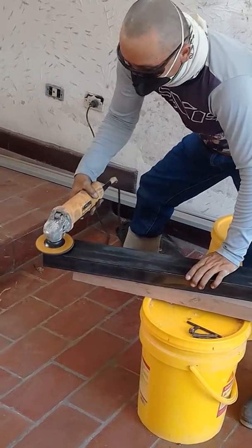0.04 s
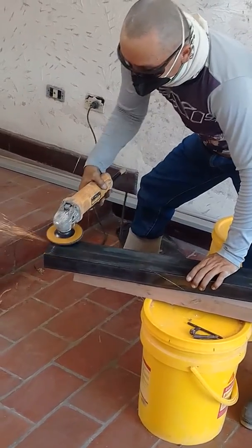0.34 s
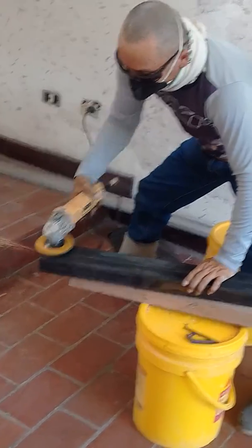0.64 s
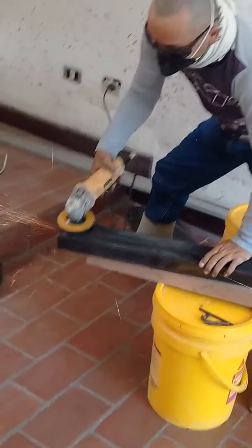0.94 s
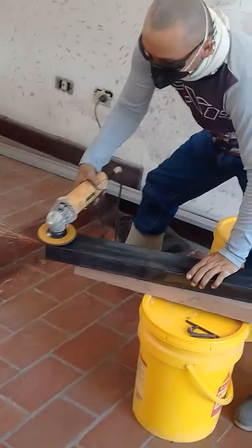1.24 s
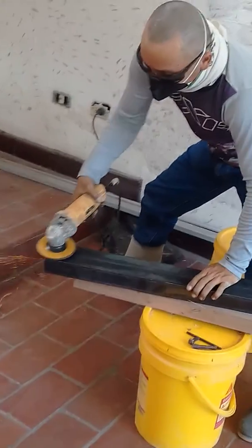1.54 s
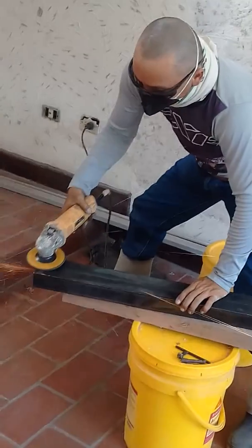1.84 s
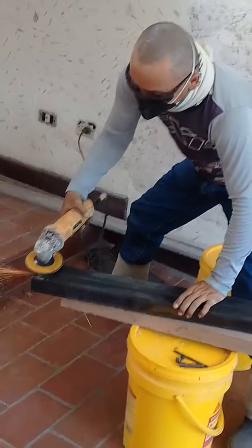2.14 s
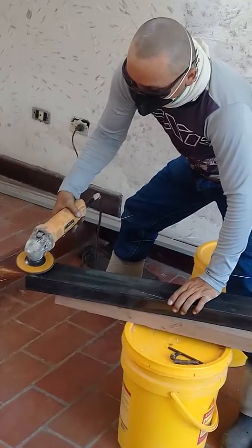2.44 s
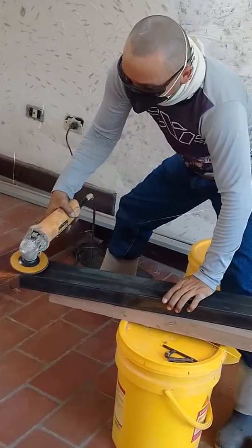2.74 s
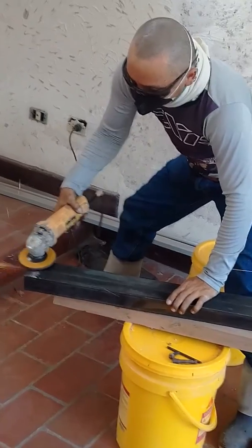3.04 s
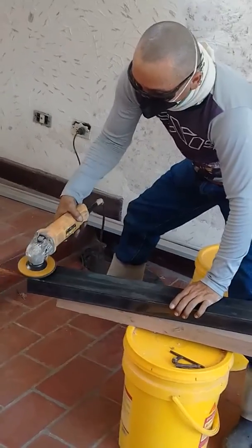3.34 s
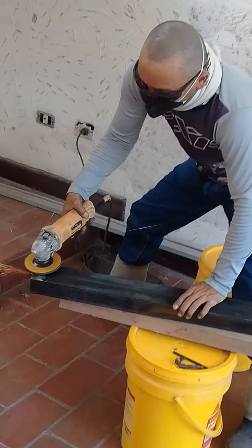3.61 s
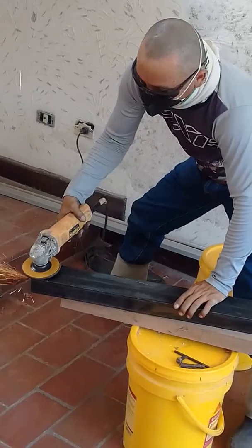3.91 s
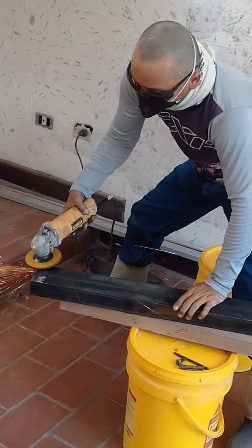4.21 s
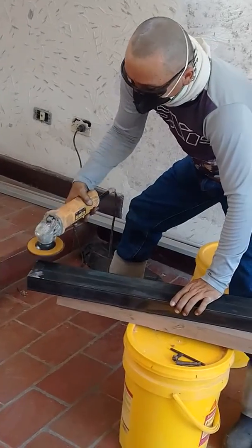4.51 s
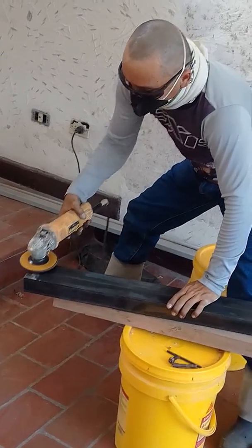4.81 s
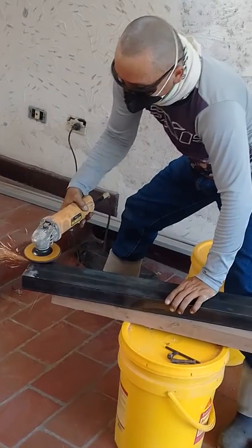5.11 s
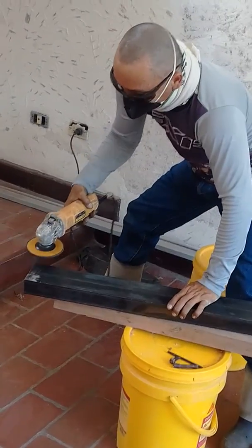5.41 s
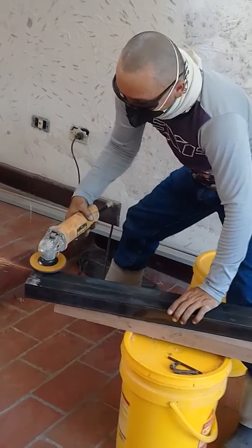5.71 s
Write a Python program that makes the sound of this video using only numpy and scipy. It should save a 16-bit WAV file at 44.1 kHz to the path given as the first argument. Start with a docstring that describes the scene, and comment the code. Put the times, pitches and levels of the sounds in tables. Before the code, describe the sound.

A corded angle grinder whines, rasping and squealing against a ringing steel tube in repeated short passes in a small room.

```python
"""A corded angle grinder works on a steel tube in a small tiled room, in short passes with two pauses.
On the steel its grit rasps and hisses, its rim squeals by stick-slip friction, the disc knocks and the
tube rings in its modes, all following the pressure and tilt of the hand. Deep cuts sizzle and subdue
the ringing. The motor whines and its fan and gears hiss throughout. The loudest peaks are soft-clipped."""
import sys
import numpy as np
from scipy import signal
from scipy.fft import rfft, irfft
from scipy.io import wavfile
from scipy.ndimage import uniform_filter1d

SR = 44100
rng = np.random.default_rng(int(sys.argv[2]) if len(sys.argv) > 2 else 0)


def file_out(sig):
    """Save sig as 16-bit WAV at sys.argv[1]."""
    # one column per channel
    cols = np.atleast_2d(sig).T
    # limit, then scale
    lim = np.clip(cols, -1, 1)
    pcm = np.round(lim * 32767).astype(np.int16)
    wavfile.write(sys.argv[1], SR, pcm)


N = 262836
TIME = np.arange(N) / SR


def abrasion(spindle, rasp_db, hiss_db, sizzle_db, runout=0.12):
    """Shot noise of grains tearing steel, peaking once a turn: coarse rasp, fine hiss, deep sizzle."""
    # spectra of coarse grains, fine grains and deep cutting: frequency_hz, density_db
    rasp_spectrum = [(150, -24), (400, -6), (800, -5.5), (1600, -1.5), (2600, 3.5), (3800, 0.5), (4800, 1),
                     (6200, -2), (8000, -1.5), (16000, -41)]
    grit_spectrum = [(3000, -23), (6000, -14), (8000, 4.5), (9700, 5), (11500, -3.5), (12900, -14.5),
                     (16000, -21)]
    sizzle_spectrum = [(200, -21.5), (700, 1.5), (1600, 5), (4000, -10), (9000, -14), (11800, 9),
                       (13000, 3.5), (14300, 8), (16000, -2)]
    bite = (1 + runout * np.cos(spindle)) * from_db(drift(40))
    rasp = rms_one(colour(impacts(per_s=5000, spread_db=2) * bite, rasp_spectrum))
    hiss = rms_one(colour(impacts(per_s=16000, spread_db=4) * bite, grit_spectrum))
    sizzle = rms_one(colour(impacts(per_s=5300, spread_db=10) * bite, sizzle_spectrum))
    return from_db(rasp_db) * rasp + from_db(hiss_db) * hiss + from_db(sizzle_db) * sizzle


def skid(level_db):
    """Sliding friction: grains that slip without cutting give a lower, softer hiss."""
    # spectrum of sliding grains: frequency_hz, density_db
    skid_spectrum = [(2500, -22.5), (4000, -10), (4600, -8), (5200, -3.5), (5650, 1.5), (6500, -2),
                     (7500, -3), (9000, -28)]
    return from_db(level_db) * rms_one(colour(impacts(per_s=25000, spread_db=0), skid_spectrum))


def squeal(level_db, centre_hz, direct_db=-9):
    """Stick-slip oscillation: the rim darts in pitch and excites whichever mode of the disc it passes."""
    # modes of the disc: frequency_hz, bandwidth_hz, gain_db
    disc_modes = [(6900, 200, -0.5), (7280, 76, 1), (7900, 240, -3.5), (8330, 200, -6), (8760, 160, 2.5)]
    pitch_hz = centre_hz + 360 * drift(110) + 440 * drift(900)
    slips = np.sin(2 * np.pi * np.cumsum(pitch_hz) / SR)
    ringing = sum(from_db(db) * resonance(slips, hz, width) for hz, width, db in disc_modes)
    vibration = from_db(direct_db) * slips + ringing
    # friction feeds the vibration only up to a limit, so its amplitude stays nearly even
    envelope = np.sqrt(np.abs(uniform_filter1d(vibration ** 2, size=300)) + 1e-9)
    return from_db(level_db) * vibration / envelope


def tube_ring(force, width_hz=17, swell_db=3, trim_db=-2.5):
    """Modal resonance: grinding rings the tube, each mode swelling and fading as the contact travels."""
    # modes of the tube: frequency_hz, gain_db
    tube_modes = [(1070, 4.5), (1632, -2), (2433, 8.5), (2611, 3.5), (2847, 9.5), (3445, 6.5), (4285, 11.5),
                  (4320, 9.5), (4610, 11.5), (4700, 13), (4980, 3), (5766, 3), (6379, 5.5), (6756, 12.5),
                  (7210, 6), (7272, 11), (7880, 13.5), (8010, -1), (8339, -15), (8500, -3), (8656, 9),
                  (9695, 2), (10363, 12.5), (11063, 6), (11350, 13), (11697, 8), (12317, 14), (13838, 7),
                  (14135, 9), (14610, 3)]
    return sum(from_db(db + trim_db) * resonance(force * from_db(swell_db * drift(5.6)), hz, width_hz)
               for hz, db in tube_modes)


def tube_singing():
    """Self-excited vibration: friction feeds a single mode, which swells to a rough note and dies."""
    # notes of the tube: middle_s, length_s, pitch_hz, level_db
    notes = [(0.876, 0.15, 4310, -25), (1.21, 0.1, 1635, -30.5), (1.244, 0.078, 3445, -32),
             (1.44, 0.15, 1610, -27), (1.549, .08, 4610, -25.5), (2.099, 0.11, 1077, -37),
             (2.301, 0.23, 4970, -27.5), (2.38, 0.46, 2841, -24), (2.48, 0.11, 2430, -25.5),
             (2.696, 0.12, 2840, -22), (2.86, 0.18, 1078, -30.5), (3.1, 0.73, 2850, -39.5),
             (5.077, .16, 4620, -28), (5.92, .16, 562.4, -30.5)]
    flutter = from_db(2 * drift(22))
    waver_rad = drift(12) / 2
    sound = np.zeros(N)
    for middle_s, length_s, hz, db in notes:
        near = np.abs(TIME - middle_s) < length_s
        swell = np.exp(-(2 * (TIME[near] - middle_s) / length_s) ** 4)
        tone = np.sin(2 * np.pi * hz * TIME[near] + waver_rad[near])
        sound[near] += from_db(db) * swell * flutter[near] * tone
    return sound


def tube_drone(force, width_hz=9):
    """Beating: the pressing disc shakes the whole tube, and two close bending modes interfere."""
    # low bending modes: frequency_hz, relative_db
    bending_modes = [(565, 0), (607, -1)]
    shake = rng.standard_normal(N) * force
    bending = sum(from_db(db) * resonance(shake, hz, width_hz) for hz, db in bending_modes)
    return rms_one(bending) * np.std(shake)


def knocking(level_db):
    """Impact noise: the disc hops on the steel in a few hundred dull blows a second."""
    # spectrum of the blows: frequency_hz, density_db
    knock_spectrum = [(30, -26), (60, -14.5), (100, -2.5), (160, 2.5), (300, 2.5), (550, 0.5), (900, -3.5),
                      (1600, -9), (4000, -42)]
    return from_db(level_db) * rms_one(colour(impacts(per_s=430, spread_db=5), knock_spectrum))


def clatter(level_db, hz=880, width_hz=900):
    """Hard impacts: under high pressure the edge strikes sharper, brighter blows."""
    blows = resonance(impacts(per_s=900, spread_db=6), hz, width_hz)
    return from_db(level_db) * rms_one(resonance(blows, hz, 2 * width_hz))


def bumps(thud_hz=420):
    """Impulse response: each hard landing is one heavily damped swing of the disc."""
    # the disc lands or catches: time_s, peak_db
    landings = [(.148, -22), (.341, -21), (.38, -19), (1.024, -18), (1.073, -19), (1.092, -17),
                (1.333, -20), (1.342, -14), (1.354, -14), (1.426, -11), (4.952, -8), (4.971, -9),
                (4.978, -17)]
    swing = resonance(signal.unit_impulse(SR // 20), thud_hz, width_hz=620)
    swing = resonance(swing, thud_hz, width_hz=1650)
    clicks = np.zeros(N)
    for time_s, db in landings:
        clicks[round(time_s * SR)] = from_db(db)
    return signal.fftconvolve(clicks, swing / np.abs(swing).max())[:N]


def motor(spindle, level_db, throb=0.071, case_db=15, whine_db=-31):
    """Rotating-machine noise: a whine locked to the spindle, fan air, and teeth ringing the gear case."""
    # resonances of the gear case: frequency_hz, bandwidth_hz, gain_db
    case_modes = [(1690, 510, -12.5), (5794, 210, 1), (8690, 640, -3.5), (10400, 560, -39.5),
                  (11380, 230, -35)]
    # spectrum of the fan's air: frequency_hz, density_db
    fan_spectrum = [(40, -35), (150, -30), (400, -34), (800, -13.5), (1400, -3.5), (2400, 3), (3800, -0.5),
                    (6500, 6), (8200, 4), (10500, 3), (12500, -6.5), (16000, -7)]
    # partials of motor and gears: spindle_multiple, relative_db
    partials = [(2, -23), (3, -2), (4, -10), (5.5, -1), (7, 3), (8, 1), (9.5, 8), (10.5, -0.5)]
    pulsing = 1 + throb * np.cos(spindle)
    teeth = rms_one(impacts(per_s=7000, spread_db=3)) * pulsing
    case = sum(from_db(db) * resonance(teeth, hz, width) * from_db(2.65 * drift(11.4))
               for hz, width, db in case_modes)
    fan = colour(rng.standard_normal(N) * pulsing, fan_spectrum)
    whine = sum(from_db(db + 1.2 * drift(8)) * np.sqrt(2) * np.sin(multiple * spindle)
                for multiple, db in partials)
    hiss = rms_one(fan + from_db(case_db) * case)
    return from_db(level_db) * (hiss + from_db(whine_db) * whine)


def room(x, t60_s=0.3, wet_db=-6):
    """Reverberation: hard walls and floor return a dense, short tail, thin in the bass."""
    t = TIME[:SR // 2]
    tail = rng.standard_normal(len(t)) * from_db(-60 * t / t60_s) * (t > .004)
    tail = signal.sosfilt(signal.butter(1, 700, "high", fs=SR, output="sos"), tail)
    return x + from_db(wet_db) * signal.fftconvolve(x, tail / np.linalg.norm(tail))[:N]


def hand_pressure(resting_db=-16, mid_stroke_db=2, press_s=.03, release_s=.0701):
    """Normal force of the hand in dB, and an arch that rises from 0 to 1 and back over each stroke."""
    # pushes along the tube: start_s, end_s, pressure_db
    strokes = [(0, .06, -9), (.135, .15, -8.5), (.33, .76, -2), (.78, 1.0, -9.5), (1.02, 1.2, -0.5),
               (1.335, 1.61, 1), (1.72, 1.97, 1), (2.16, 2.43, 0), (2.51, 2.81, .5), (2.94, 3.42, 0),
               (3.48, 3.97, -1), (4.0, 4.35, -0.5), (4.96, 5.28, -1), (5.8, 5.96, -7.5)]
    force, arch = np.full(N, from_db(resting_db)), np.zeros(N)
    for start, end, db in strokes:
        swell = np.sin(np.pi * np.clip((TIME - start) / (end - start), 0, 1))
        push = held(start, end, press_s, release_s) ** 2 * from_db(db + mid_stroke_db * swell)
        force = np.maximum(force, push)
        arch += swell
    return 20 * np.log10(force), arch


def cut_depth(dig_s=.05):
    """Penetration of the edge into the steel, 0 while it only skims."""
    # deep cuts: start_s, end_s, relative_depth
    cuts = [(1.869, 1.89, 0.24), (2.7, 2.73, 0.34), (3.56, 3.62, 1.0), (3.699, 3.92, 0.71),
            (4.041, 4.12, .5), (4.2, 4.31, 1.05), (5.055, 5.065, .35), (5.191, 5.26, 1.2)]
    return np.max([depth * held(start, end, dig_s, dig_s) for start, end, depth in cuts], axis=0)


def in_contact(lift_s=0.021):
    """Mechanical coupling: 1 while the disc touches the steel, fading to 0 as it lifts."""
    # spells of contact: start_s, end_s
    spells = [(0, 4.39), (4.957, 5.345), (5.794, 5.96)]
    return sum(held(start, end, lift_s, lift_s) for start, end in spells)


def impacts(per_s, spread_db):
    """Poisson process: clicks at random moments with uneven strengths."""
    sizes = from_db(spread_db * np.clip(rng.standard_normal(N), -2, 2)) * rng.choice([-1, 1], N)
    return sizes * (rng.random(N) < per_s / SR)


def resonance(x, hz, width_hz):
    """Damped oscillator: a two-pole resonance with gain 1 at its peak."""
    radius = np.exp(-np.pi * width_hz / SR)
    feedback = [1, -2 * radius * np.cos(2 * np.pi * hz / SR), radius ** 2]
    return signal.lfilter(np.array([1, 0, -1]) * (1 - radius ** 2) / 2, feedback, x)


def colour(x, spectrum, size=4096):
    """Minimum-phase filtering: a causal response with the given spectrum."""
    hz, db = np.transpose(spectrum)
    bins_hz = np.maximum(np.fft.rfftfreq(size, 1 / SR), 1)
    gain = from_db(np.interp(np.log(bins_hz), np.log(hz), db))
    cepstrum = irfft(np.log(gain))[:size // 2]
    cepstrum[1:] *= 2
    response = irfft(np.exp(rfft(cepstrum, size)))
    return signal.fftconvolve(x, response)[:N]


def drift(rate_hz, step=8):
    """Low-passed noise of rms 1, changing about `rate_hz` times a second."""
    pole = np.exp(-2 * np.pi * rate_hz * step / SR)
    noise = rng.standard_normal((N + SR) // step + 2)
    slow = signal.lfilter([1], [1, -2 * pole, pole ** 2], noise)[SR // step:]
    return np.repeat(rms_one(slow), step)[:N]


def held(start, end, attack_s, release_s):
    """Trapezoidal envelope: 1 from start to end, with a ramp before and after."""
    return np.interp(TIME, [start - attack_s, start, end, end + release_s], [0, 1, 1, 0])


def eased(x, window_s):
    """Moving average of a control."""
    return uniform_filter1d(x, int(window_s * SR))


def from_db(db):
    """Decibels to amplitude ratio."""
    return 10 ** (np.asarray(db) / 20)


def rms_one(x):
    """Normalisation to rms 1."""
    return x / np.sqrt(np.mean(x ** 2) + 1e-20)


def scene(free_turns_per_s=180, sag_turns_per_s=3.5, motor_in_pauses_db=-19.5, motor_ducked_db=-24):
    """Source and resonator: pressure, tilt and depth shape the grinding, which excites the tube."""
    # the disc starts nearly flat (1) and tips on to its edge (0): time_s, flatness
    tilt = [(0, 1.0), (.3, 1.0), (.5, .75), (.8, .9), (1.0, 0.54), (1.15, 0.13), (1.9, 0.01), (2.35, 0.12),
            (3.5, 0.01), (5.96, 0.09)]
    flat = np.interp(TIME, *np.transpose(tilt))
    pressure_db, arch = hand_pressure()
    depth, touching = cut_depth(), in_contact()

    def level(base_db, per_pressure_db, flat_db, cut_db):
        """Level in dB, linear in pressure, flatness and depth of cut."""
        return base_db + per_pressure_db * pressure_db + flat_db * flat + cut_db * depth

    rasp_db = level(-23.5, 0.31, flat_db=1, cut_db=3)
    hiss_db = level(-18.5, 0.14, flat_db=-13, cut_db=0.05)
    sizzle_db = level(-29, 0.25, flat_db=-3, cut_db=10.5)
    skid_db = level(-27, 0, flat_db=7.5, cut_db=-12)
    squeal_db = level(-19.5, 0.4, flat_db=4, cut_db=1.3)
    ring_db = level(0.3, 0.1, flat_db=-0.5, cut_db=-18)
    drone_db = level(-38.5, 0.1, flat_db=0.5, cut_db=2)
    knock_db = level(-27.5, 1, flat_db=-0.7, cut_db=1)
    clatter_db = level(-34, 1.6, flat_db=-14, cut_db=9.5)

    turns_per_s = free_turns_per_s - sag_turns_per_s * eased(touching * from_db(pressure_db), window_s=.15)
    spindle = 2 * np.pi * np.cumsum(turns_per_s * (1 + 0.00299 * drift(15.8))) / SR
    # the motor noise is turned down during the loud grinding, as by a recorder's gain control
    ducking = eased(touching, window_s=.052)
    machine = motor(spindle, motor_in_pauses_db + (motor_ducked_db - motor_in_pauses_db) * ducking)
    scrape = touching * (abrasion(spindle, rasp_db, hiss_db, sizzle_db) + skid(skid_db))
    squeal_hz = 7650 + 360 * arch - 480 * flat + 170 * depth
    screech = touching * squeal(squeal_db, squeal_hz)
    settled = np.interp(TIME - .016, TIME, touching)  # hopping starts just after the disc lands
    blows = touching * settled * (knocking(knock_db) + clatter(clatter_db)) + bumps()
    tube_force = (scrape + from_db(-7) * screech) * from_db(ring_db)
    steel = tube_ring(tube_force) + tube_drone(touching * from_db(drone_db)) + tube_singing()
    return np.tile(room(machine + scrape + screech + blows + steel), (2, 1))


def record(dry, input_db=1.19, ceiling=.47, low_cut_hz=55, high_cut_hz=15800):
    """Saturation and band limiting: the loudest peaks are rounded off, then deep bass and top are cut."""
    loud = dry * from_db(input_db)
    rounded = loud / (1 + (loud / ceiling) ** 6) ** (1 / 6)
    thinned = signal.sosfilt(signal.butter(2, low_cut_hz, "high", fs=SR, output="sos"), rounded)
    return signal.sosfilt(signal.ellip(12, .1, 90, high_cut_hz, fs=SR, output="sos"), thinned)


dry = scene()
out = record(dry)
file_out(out)
```